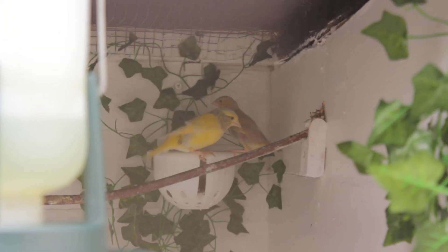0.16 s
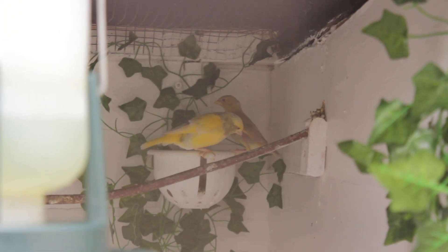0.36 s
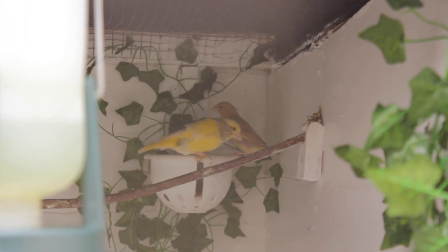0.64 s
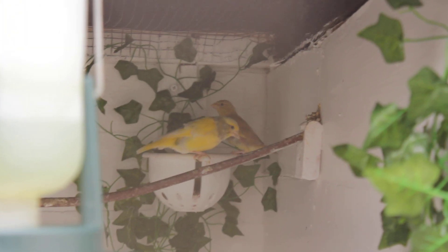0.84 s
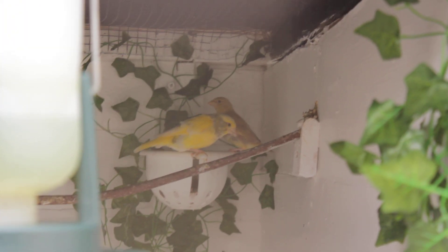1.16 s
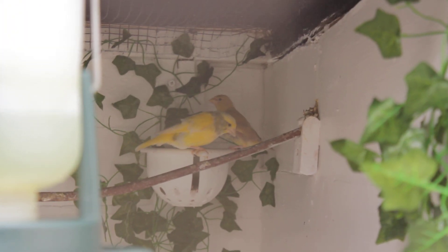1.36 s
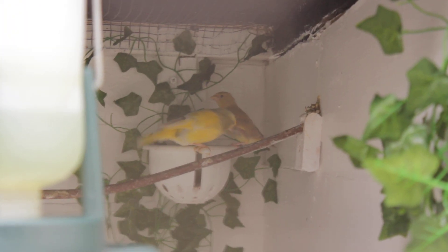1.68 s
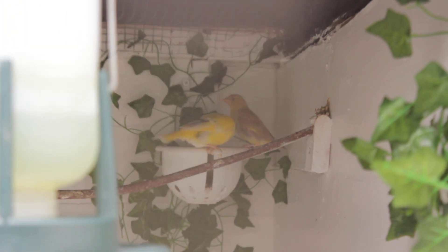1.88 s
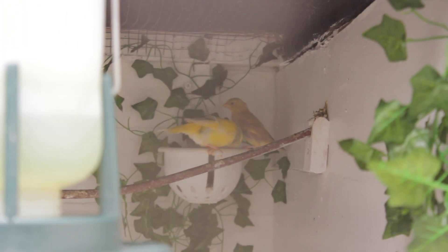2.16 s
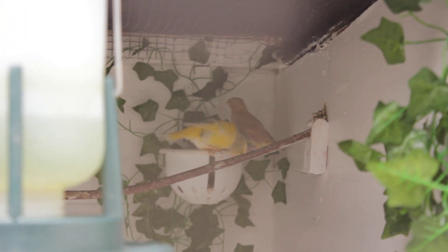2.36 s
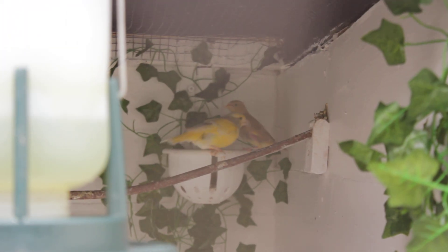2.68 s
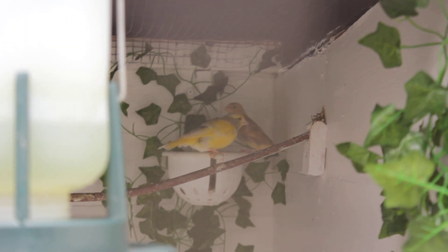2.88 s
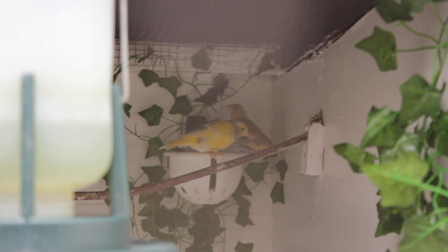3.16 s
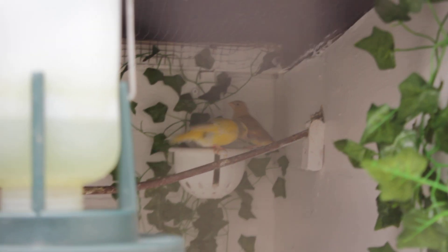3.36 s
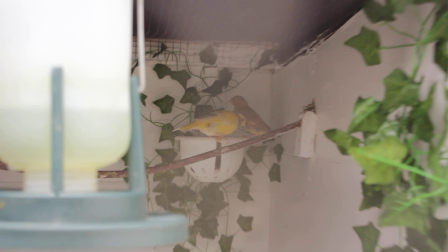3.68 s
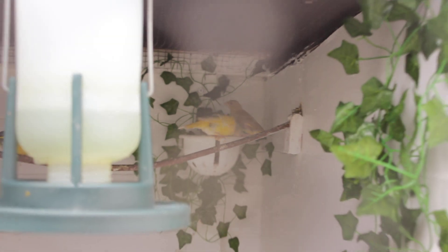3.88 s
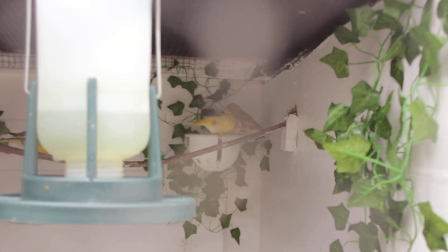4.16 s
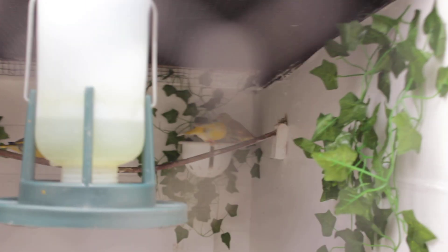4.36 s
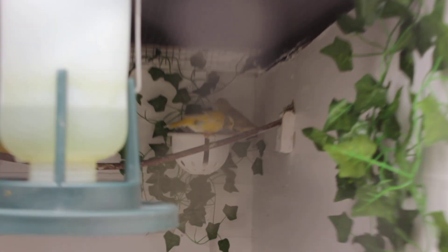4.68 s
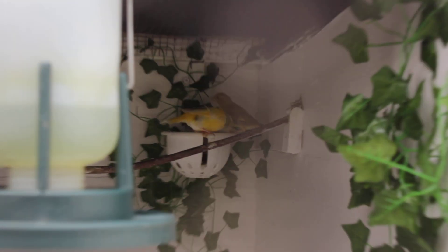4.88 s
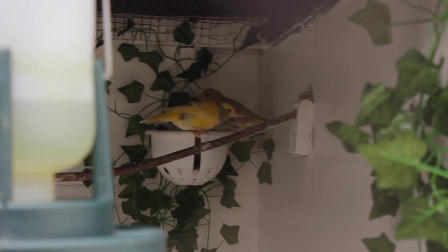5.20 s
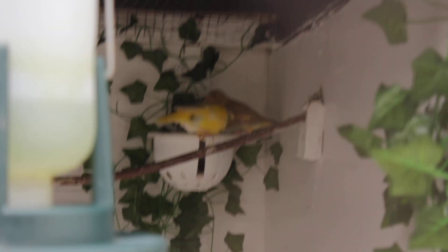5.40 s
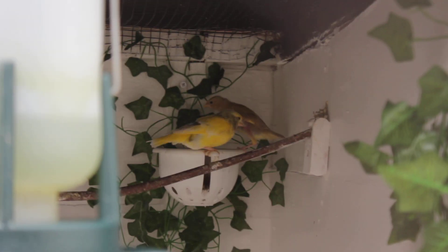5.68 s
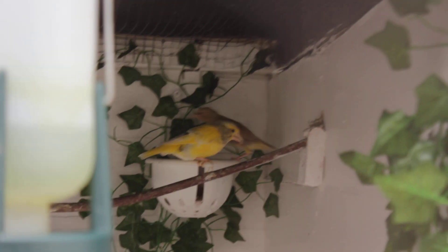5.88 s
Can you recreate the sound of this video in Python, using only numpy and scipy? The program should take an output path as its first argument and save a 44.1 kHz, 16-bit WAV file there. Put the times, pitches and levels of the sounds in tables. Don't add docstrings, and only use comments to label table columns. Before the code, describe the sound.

A small hard-walled birdroom, finches close to a handheld microphone with faint hiss. At 0 s there is a knock with rumble and a burst of twitter, then a high chip. From 0.3 to 1.0 s a bird runs a fast falling trill, about twelve notes a second; from 1.1 to 1.8 s it becomes wider rising sweeps with tiny crackles. Around 1.9-2.3 s come dropping chirps, then a low pure whistle near 2.4 s and a twice-repeated reedy phrase until 2.9 s. Falling cries follow at 3.1-3.5 s. Clear high whistles hold at 3.65 and 4.0 s. Rapid chatter runs 4.3-4.65 s, then a softer low trill to 5.1 s, with a faint motor whine and a rustling bump near 4.9 s. Four buzzy chips sound at 5.55-5.9 s over a stronger distant chorus, ending on a falling cry. Perch knocks tap irregularly, mainly after 2 s.

```python
import sys
import numpy as np
from scipy import signal
from scipy.fft import rfft, irfft
from scipy.io import wavfile
from scipy.ndimage import map_coordinates

SR = 44100
rng = np.random.default_rng(int(sys.argv[2]) if len(sys.argv) > 2 else 0)


def persist_wave(psi):
    counts = np.round(np.clip(psi, -1, 1) * 32767).astype(np.int16)
    wavfile.write(sys.argv[1], SR, np.atleast_2d(counts).T)


def to_linear_factor(level_db):
    exponent = np.asarray(level_db, float) / 20
    return 10 ** exponent


N = 266319


def in_time(rows):
    s, *columns = np.transpose(rows)
    return [np.interp(np.arange(N) / SR, s, c) for c in columns]


def at_hz(points, hz):
    points = np.array(points)
    return np.interp(np.log(hz), np.log(points[:, 0]), points[:, 1])


def rms_one(x):
    return x / np.sqrt(np.mean(x ** 2) + 1e-20)


def band(x, lo_hz, hi_hz):
    limits = [lo_hz, min(hi_hz, .45 * SR)]
    return signal.sosfilt(signal.butter(2, limits, "band", fs=SR, output="sos"), x)


def drift(rate_hz):
    r = np.exp(-2 * np.pi * rate_hz / SR)
    noise = rng.standard_normal(N + SR)
    smooth = signal.lfilter([1], [1, -2 * r, r * r], noise)
    return rms_one(smooth[SR:])


def add(out, s, sound):
    at = max(int(s * SR), 0)
    out[at:at + len(sound)] += sound[:max(N - at, 0)]


def room(x, stretch):
    # f/Hz, time to fall 60 dB/s
    decay = [(1500, 0.048), (3500, 0.33), (7000, 0.36), (14000, 0.15)]
    early_db, early_t60_s = -2.5, 0.18
    edges_hz = [60, 2000, 5000, 10000, 18000]
    t = np.arange(SR // 2) / SR
    noise = rng.standard_normal((5, len(t)))
    tail = noise[4] * to_linear_factor(early_db - 60 * t / early_t60_s)
    for k, (hz, t60) in enumerate(decay):
        tail = tail + band(noise[k], edges_hz[k], edges_hz[k + 1]) * to_linear_factor(-60 * t / (t60 * stretch))
    tail = tail * np.clip(t / 0.0023, 0, 1)
    return signal.fftconvolve(x, tail / np.sqrt(np.sum(tail ** 2)))[:N]


def syrinx(pitch, overtones):
    # f/Hz, level/dB
    beak = [(4000, -9.5), (5900, -1), (6700, -2.5), (7800, -14.5), (11000, 0), (14000, -9), (16000, -25)]
    phase = 2 * np.pi * np.cumsum(pitch) / SR
    voice = np.sin(phase)
    for multiple, db in overtones:
        k = round(2 * multiple) / 2
        level = to_linear_factor(db + at_hz(beak, k * pitch))
        voice = voice + level * np.sin(k * phase) * (k * pitch < .4 * SR)
    return np.sqrt(2) * voice


def note_time(length):
    return np.arange(int(max(length, .005) * SR)) / SR


def glide(length, start_hz, end_hz, bend, overtones, hook=0, attack=0.0005, release=0.0008):
    t = note_time(length)
    along = np.clip((t - hook) / (t[-1] + 1 / SR - hook), 0, 1)
    pitch = end_hz + (start_hz - end_hz) * (1 - along) ** max(bend, .1)
    shape = np.clip(np.minimum(t / attack, (t[-1] - t) / release), 0, 1)
    return syrinx(pitch, overtones) * np.sin(shape * np.pi / 2) ** 2


def air():
    # f/Hz, level/dB per Hz
    spectrum = [(15, -37), (40, 0.5), (100, -21), (300, -22.5), (800, -5), (2000, -29), (4900, -0.5),
                (6000, -36), (15500, -61)]
    colour = to_linear_factor(at_hz(spectrum, np.arange(1, N // 2 + 2) * SR / N))
    return to_linear_factor(-54) * rms_one(irfft(rfft(rng.standard_normal(N)) * colour, N))


def handling_rumble():
    # t/s, level/dB
    handling = [(0.0, -15.5), (0.12, -40.5), (0.57, -50.5), (1.82, -47.5), (2.47, -36.5), (3.25, -48.5),
                (4.86, -39), (4.91, -29.5), (5.08, -32), (6.04, -47.5)]
    level_db, = in_time(handling)
    noise = band(rng.standard_normal(N), 93.0, 376)
    return to_linear_factor(level_db - 8.5 + 2.96 * drift(19.0)) * rms_one(noise)


def stirring():
    # t/s, rustle level/dB
    stir = [(0.0, -36), (0.12, -48.5), (0.57, -62), (1.82, -55), (2.47, -39.5), (3.25, -51.5), (4.0, -36.5),
            (4.8, -35.5), (4.92, -24), (5.08, -29), (6.04, -47)]
    hiss_follows = 0.17
    rustle_db, = in_time(stir)
    hiss_db = -60 + hiss_follows * (rustle_db + 45)
    rustle = rms_one(band(band(rng.standard_normal(N), 580, 4170), 250, 9800))
    hiss = rms_one(band(rng.standard_normal(N), 5200, 12500))
    return to_linear_factor(rustle_db - 5.0 + 3.4 * drift(9.6)) * rustle + to_linear_factor(hiss_db + 2.5 * drift(9)) * hiss


def far_chorus(count=2200):
    # t/s, twitter level/dB
    twitter = [(0, -19), (.1, -41), (.3, -43), (1.1, -75), (1.8, -41), (2.2, -37.5), (3.1, -37), (3.6, -40),
               (4, -40.5), (4.3, -34), (4.5, -45), (4.75, -44), (4.9, -36), (5.18, -29.5), (5.28, -33),
               (5.38, -28.5), (6.04, -29.5)]
    out = np.zeros(N)
    for when, long, high, slide, loud in rng.random((count, 5)):
        middle_hz = 2800 * (4600 / 2800) ** high
        sweep = 1 + .5 * (slide - .3)
        chip = glide(.01 + .015 * long, middle_hz * sweep, middle_hz / sweep, 1.2, [])
        add(out, when * N / SR, to_linear_factor(5 * loud) * chip)
    level_db, = in_time(twitter)
    return to_linear_factor(level_db) * rms_one(room(out, stretch=1.1))


def knocks():
    # t/s, peak level/dB, wood f/Hz, crack level/dB
    hops = [(0.009, -14, 143, -43), (0.4, -58, 121, -68), (1.11, -53, 204, -30), (1.627, -42, 724, -34),
            (1.897, -38, 183, -39), (2.092, -35, 109, -29), (2.387, -31, 175, -25),
            (2.472, -35, 313, -25.5), (2.557, -23, 760, -30), (2.78, -29, 141, -25),
            (2.958, -32, 730, -31.5), (3.025, -27, 227, -54), (3.129, -31.5, 600, -35),
            (3.283, -36, 620, -39), (3.394, -38, 183, -33.5), (3.479, -38, 510, -68),
            (4.003, -29.5, 840, -26.5), (4.11, -28.5, 312, -23), (4.333, -25, 1060, -22),
            (4.345, -52, 543, -17.5), (4.553, -28, 119, -22), (4.589, -20, 770, -46),
            (4.865, -23, 774, -27), (4.9, -37, 119, -28), (4.945, -45, 300, -29), (5.375, -24, 322, -40),
            (5.43, -22.5, 344, -26.5), (5.867, -27.5, 191, -27), (5.899, -24.5, 236, -53),
            (5.97, -27, 191, -53)]
    # t/s, f/Hz, level/dB, length/s
    drum = [
        (4.905, 103, -28, .09),
    ]
    out, t = np.zeros(N), np.arange(SR // 8) / SR
    for s, db, hz, crack_db in hops:
        wood = np.sin(2 * np.pi * hz * t) * to_linear_factor(-60 * t / 0.034)
        noise = rng.standard_normal(len(t))
        crack = rms_one(band(band(noise, 200, 4500), 140, 6500)) * to_linear_factor(-60 * t / 0.1)
        add(out, s, to_linear_factor(db - 5.5) * wood)
        add(out, s, to_linear_factor(crack_db - 10.0) * crack)
    for s, hz, db, length in drum:
        shape = np.clip(np.minimum(t / 0.0029, (length - t) / 0.037), 0, 1)
        add(out, s, to_linear_factor(db) * np.sin(2 * np.pi * hz * t) * shape)
    return out


def calls():
    loud_cry = {"falling trill": (0.055, 4722, 2900, 2.4, 0.0061), "foot": (0.031, 2690, 2666, 1.5, 0.0088),
                "rising trill": (0.115, 2980, 4790, 2.8, 0.041),
                "broad foot": (0.04, 2800, 2510, 2.06, 0.0093),
                "broad fall": (0.105, 4450, 2505, 4.2, 0.02), "chatter": (0.012, 5150, 2900, 1.2, 0.002),
                "chatter back": (0.016, 3300, 4850, 1.257, 0.003),
                "long fall": (0.118, 4080, 2100, 1.1, 0.019), "drop": (0.018, 5830, 2900, 1.4, 0.0023),
                "scoop": (0.048, 2400, 2780, 3, 0.0015), "dip": (0.049, 2640, 2590, 0.83, 0.003),
                "pickup": (0.04, 3550, 4600, 2.94, 0.0075), "crest": (0.0535, 4800, 5540, 2.76, 0.011),
                "chip": (0.0266, 5750, 5050, 3.47, 0.0026), "lead-in": (0.0217, 6150, 5600, 0.95, 0.024),
                "arc": (0.059, 2800, 2660, 0.734, 0.022)}
    soft_cry = {"reed": (0.0536, 5520, 5420, 6.0, 0.011), "low tuck": (0.02, 2730, 2470, 1.26, 0.0015),
                "mid tuck": (0.022, 3700, 3750, 1.3, 0.0031), "seep": (0.036, 7500, 7000, 2.3, 0.004),
                "thin fall": (0.05, 9800, 7300, 1.8, 0.006),
                "thin whistle": (0.091, 6980, 6780, 1.4, 0.004),
                "far drop": (0.027, 6500, 4200, 0.78, 0.002), "slip": (0.14, 4000, 3200, 3.5, 0.0075),
                "low slip": (0.051, 3650, 2100, 2.1, 0.0056), "croon": (0.0176, 1590, 1620, 0.91, 0.0032),
                "low trill": (0.0426, 2650, 2185, 5.07, 0.0023),
                "beak snap": (0.027, 5850, 7000, 1.3, 0.0058), "fall tail": (0.049, 3050, 2300, 1.1, 0.017),
                "grunt": (0.0215, 2150, 2350, 1.5, 0.0027), "swoop": (0.086, 7300, 5100, 0.45, 0.015),
                "short swoop": (0.058, 5900, 4900, 0.616, 0.0089),
                "far whistle": (0.08, 5900, 5300, 1.8, 0.023), "rasp": (0.011, 8100, 6900, 1.2, 0.003),
                "low hum": (0.07, 2300, 2120, 1.6, 0.0087), "haze": (0.022, 7400, 3800, 0.73, 0.0027)}
    reedy_names = ("crest", "chip", "lead-in", "reed")
    song = {"falling trill": [(0.366, -15.5, 4710), (0.449, -18.5, 4700), (0.535, -18.5, 4700),
            (0.613, -19, 4900), (0.696, -18, 4690), (0.778, -17, 4900), (0.862, -17.5, 4820),
            (0.946, -16, 4666)], "foot": [(0.322, -15.5), (0.408, -24.5), (0.49, -23.5), (0.572, -22),
            (0.655, -23), (0.737, -17.5), (0.82, -20.5), (0.905, -22), (0.99, -26)],
            "broad foot": [(3.09, -22), (3.285, -19.5), (3.485, -26)],
            "rising trill": [(1.187, -16.5, 2880), (1.312, -15, 3030), (1.441, -17, 2910),
            (1.573, -18, 2930), (1.701, -19.5, 2970)], "broad fall": [(3.234, -16.5), (3.437, -17.5),
            (5.995, -14.5)], "chatter": [(4.301, -25.5), (4.342, -19.5), (4.8, -30), (4.426, -22.5),
            (4.468, -21.5), (4.511, -21), (4.553, -19), (4.592, -23, 4700), (4.612, -26, 4500)],
            "chatter back": [(4.312, -30.5), (4.352, -38), (4.405, -30), (4.438, -30), (4.48, -28),
            (4.525, -30.5), (4.567, -33), (4.604, -33), (4.63, -36.5)], "long fall": [(4.736, -25.5),
            (4.968, -25.5), (5.205, -30.5)], "drop": [(1.953, -21, 6300), (2.145, -13), (5.168, -26)],
            "scoop": [(2.004, -32.5), (2.174, -28.5)], "arc": [(2.548, -24.5), (2.798, -24.5)],
            "dip": [(2.63, -20), (2.895, -20.5)], "pickup": [(2.49, -23, 3810), (2.742, -23, 3830)],
            "crest": [(2.532, -21.5), (2.785, -22.5)], "chip": [(5.55, -19, 5700), (5.652, -17.5, 5710),
            (5.755, -19, 5770), (5.855, -20.5, 5670)], "lead-in": [(5.532, -26.5), (5.634, -32.5),
            (5.734, -26.5), (5.838, -29.5)]}
    answers = {"reed": [(2.285, -29, 5000), (2.495, -32.5, 5600)], "low tuck": [(5.55, -28), (5.655, -29),
               (5.755, -28), (5.86, -29)], "mid tuck": [(5.582, -28.5), (5.667, -30), (5.769, -33),
               (5.808, -29, 3100), (5.722, -32.5, 3550), (5.605, -31, 3300)], "seep": [(5.497, -38.5),
               (5.593, -40.5), (5.706, -39), (5.863, -43)], "thin fall": [(2.931, -50.5), (3.141, -49),
               (3.391, -52.5), (3.629, -57)], "thin whistle": [(1.068, -58), (2.612, -47.5), (2.78, -45.5)],
               "far drop": [(3.01, -39, 5930), (3.21, -38), (3.892, -48)], "slip": [(3.621, -45),
               (3.922, -38), (3.855, -44.5, 4500)], "low slip": [(3.224, -26.5), (3.712, -43.5)],
               "croon": [(4.845, -36), (4.918, -19), (4.953, -19.5)], "low trill": [(4.655, -30.5),
               (4.712, -29.5), (4.772, -28), (4.83, -29), (4.89, -30.5), (4.945, -32), (5.003, -29.5),
               (5.06, -29.5), (5.115, -31)], "beak snap": [(1.18, -41.5), (1.313, -38), (1.44, -37),
               (1.57, -39.5), (1.7, -44)], "fall tail": [(4.8, -32), (5.035, -31.5), (5.265, -32)],
               "grunt": [(2.503, -31.5), (2.753, -38.5)], "swoop": [(1.872, -37.5), (3.52, -52, 7500)],
               "short swoop": [(2.112, -32.5)], "far whistle": [(0.26, -44.5), (0.36, -48), (0.472, -50.5)],
               "rasp": [(4.8, -46), (5.398, -42), (7, -42), (2.46, -44)], "low hum": [(2.615, -46),
               (2.83, -47.5)], "haze": [(3, -29, 6600), (2.88, -36.5, 6000), (1.578, -47, 7700),
               (4.78, -49), (4.81, -46), (4.94, -42), (5.33, -37.5, 5000), (5.1, -38, 5500)]}
    # t/s, length/s, start f/Hz, end f/Hz, level/dB
    flicks = [
        (0.288, 0.043, 4260, 2723, -16.5),
        (1.115, 0.039, 2300, 4310, -17.5),
        (1.64, 0.086, 5700, 5450, -43),
        (3.062, 0.052, 4460, 2494, -17.5),
        (4.005, 0.0092, 3500, 4060, -27.5),
        (4.58, 0.0714, 2800, 2300, -39),
        (0.148, 0.038, 6170, 5270, -22),
        (5.462, 0.048, 5730, 5120, -25),
    ]
    slides = [(0.53, 0.036, 5256, 5160, -44), (1.5, 0.012, 4180, 4750, -27),
              (1.519, 0.11, 6900, 6030, -44.5), (1.834, 0.02, 5480, 6580, -31),
              (2.049, 0.035, 6360, 7100, -32), (2.291, 0.042, 2624, 2760, -30),
              (2.401, 0.03, 4700, 4750, -41), (2.54, 0.08, 4700, 4730, -39), (2.84, 0.036, 5520, 5560, -32),
              (2.688, 0.08, 3650, 3500, -35.5), (2.855, 0.024, 2650, 2640, -16.5),
              (2.584, 0.014, 3670, 3570, -32.5), (4.14, 0.052, 2470, 3380, -32.5),
              (4.185, 0.11, 3280, 3890, -35), (4.259, 0.044, 2690, 2950, -30),
              (3.112, 0.095, 7230, 6970, -50.5), (3.335, 0.064, 6590, 6450, -57),
              (4.685, 0.029, 4500, 4700, -36.5), (5.188, 0.03, 4450, 4700, -17),
              (5.21, 0.038, 3500, 4100, -17), (4.8, 0.02, 2900, 3900, -28), (5.25, 0.0505, 4050, 4000, -29),
              (5.165, 0.025, 2200, 2900, -38.5), (0.087, 0.029, 4400, 5250, -27.5),
              (5.33, 0.026, 4600, 4550, -35), (5.495, 0.054, 6000, 5900, -44),
              (5.245, 0.084, 4620, 4515, -28), (5.385, 0.1, 3490, 3560, -32)]
    murmurs = [
        (3.606, 0.07, 780, 864, -50.5),
        (3.696, 0.035, 1076, 1180, -45),
        (4.36, 0.091, 1027, 1020, -49),
        (5.009, 0.14, 1593, 1820, -35),
        (5.191, 0.27, 1750, 1836, -48.5),
        (5.423, 0.077, 1840, 1740, -40),
    ]
    notes = []
    for repeats, shapes in [(song, loud_cry), (answers, soft_cry)]:
        for name in repeats:
            length, usual_hz, end_hz, bend, attack = shapes[name]
            for s, db, *own in repeats[name]:
                start_hz = own[0] if own else usual_hz
                notes.append((s, db, length, start_hz, end_hz, bend, attack, name in reedy_names))
    for rows, bend in [(flicks, 3.6), (slides + murmurs, 0.88)]:
        for s, length, start_hz, end_hz, db in rows:
            notes.append((s, db, length, start_hz, end_hz, bend, 0.0034, False))
    return notes


def buzz(length):
    return 1 + .8 * np.cos(2 * np.pi * 115 * note_time(length))


def near_birds():
    # multiple of the pitch, level/dB
    pure = [(2, -29), (3, -29)]
    rising = [(2, -22.5), (3, -26), (4, -30)]
    hooked = [(2, -40.5), (3, -32)]
    # multiple of that leading line, level/dB
    reedy_lines = [(1.5, -10.5), (2, -22), (2.5, -24), (3, -26)]
    distant_db, flutter_db = -31, 5.0
    near, distant = np.zeros((2, N))
    for s, db, length, start_hz, end_hz, bend, attack, reedy in calls():
        hook, release = 0, min(0.0048, length / 4)
        if start_hz > 1.5 * end_hz and length > .045:
            voice, hook, release = hooked, 0.14 * length, 0.67 * length
        elif reedy:
            voice = reedy_lines
        elif end_hz > 1.2 * start_hz:
            voice, release = rising, 0.6 * length
        else:
            voice = pure
        note = glide(length, start_hz, end_hz, bend, voice, hook, max(attack, .001), release)
        if reedy:
            note = note * buzz(length)
        add(distant if db < distant_db else near, s, to_linear_factor(db) * note)
    out = near + distant * to_linear_factor(flutter_db * drift(80))
    wobble = .3 * drift(150)
    out = map_coordinates(out, [np.arange(N) + wobble], order=3)
    return out * (1 + .17 * drift(80))


def held_tones():
    # t/s, length/s, f/Hz, level/dB
    tones = [
        (.33, 0.84, 2668, -26.5),
        (2.511, 0.61, 2608, -27.5),
        (4.65, 0.46, 2190, -33),
    ]
    out = np.zeros(N)
    for s, length, hz, db in tones:
        add(out, s, to_linear_factor(db) * glide(length, hz, hz, 1, [], release=0.14))
    return out * to_linear_factor(3.5 * drift(14))


def whistles():
    # t/s, f/Hz, level/dB
    whistle_lines = [
        [(3.632, 5470, -52), (3.648, 5200, -25), (3.682, 5045, -13.5), (3.712, 5036, -11), (3.73, 4986, -26.5),
         (3.742, 5023, -19.5), (3.808, 5047, -12), (3.892, 5028, -36), (3.9, 5000, -40)],
        [(3.958, 5423, -49), (3.974, 5080, -22), (3.992, 5054, -12), (4.024, 5037, -9.5), (4.094, 5013, -17),
         (4.1, 4940, -25), (4.122, 4982, -15.5), (4.168, 4997, -20.5), (4.3, 4940, -52)],
        [(2.34, 2736, -27), (2.368, 2680, -11.5), (2.385, 2675, -13), (2.408, 2665, -29), (2.428, 2666, -11.5),
         (2.44, 2640, -28), (2.468, 2663, -23), (2.478, 2646, -33), (2.51, 2650, -27)],
    ]
    slur = [(3.77, 2316, -30.5), (3.79, 2460, -41), (3.831, 2793, -38), (3.9, 2887, -25.5),
            (3.968, 2946, -35.5), (4.06, 2780, -50)]
    # multiple of the pitch, level/dB
    whistle_overtones = [(2, -29.5), (3, -23)]
    out, t = held_tones(), np.arange(N) / SR
    for rows in [*whistle_lines, slur]:
        pitch, db = in_time(rows)
        ends = np.clip(np.minimum(t - rows[0][0], rows[-1][0] - t) / 0.0023, 0, 1)
        out += syrinx(pitch, whistle_overtones) * to_linear_factor(db) * ends
    return out


def lens_motor():
    # f/Hz, width/Hz, level/dB
    resonances = [(9200, 350, -2), (10100, 250, -4), (11000, 300, -4), (12500, 900, 2), (13750, 300, -2)]
    # t/s, level/dB
    motor_on = [
        (4.38, -80),
        (4.46, -53),
        (4.7, -50),
        (4.84, -54),
        (4.95, -80),
    ]
    out, noise = 0, rng.standard_normal(N)
    for hz, width_hz, db in resonances:
        out = out + to_linear_factor(db) * rms_one(band(noise, hz - width_hz / 2, hz + width_hz / 2))
    return rms_one(out) * to_linear_factor(in_time(motor_on)[0])


def scene():
    birds, held, hops = near_birds(), whistles(), knocks()
    direct = to_linear_factor(-4) * birds + to_linear_factor(-2.6) * held + hops
    echoes = room(to_linear_factor(0.5) * birds + to_linear_factor(-6) * held + to_linear_factor(3.5) * hops, stretch=0.78)
    background = far_chorus() + handling_rumble() + stirring() + lens_motor() + air()
    return (direct + echoes + background)[None]


def band_limit(x):
    return signal.sosfilt(signal.butter(12, 15750, fs=SR, output="sos"), x)


def record(dry):
    # t/s, depth/dB, recovery/s
    ducks = [
        (0.058, 2, 0.022),
        (1.092, 3, 0.042),
        (3.046, 7, 0.026),
        (3.603, 4, 0.061),
        (4.362, 5.5, 0.042),
        (5.443, 6.5, 0.048),
    ]
    # t/s, peak level/dB
    tick_list = [(0.401, -27.5), (0.318, -34), (.656, -51), (.745, -29.5), (0.798, -32), (1.361, -28),
                 (1.476, -37), (1.52, -36), (1.632, -23), (1.75, -26), (1.23, -27.5), (1.268, -28.5),
                 (1.371, -33), (1.398, -33), (1.5, -27.5), (3.042, -23.5), (3.071, -31), (3.082, -28)]
    t, cut_db, ticks = np.arange(N) / SR, np.zeros(N), np.zeros(N)
    for s, depth_db, recovery_s in ducks:
        cut_db += depth_db * (t > s) * np.clip(1.5 - (t - s) / recovery_s, 0, 1)
    x = dry * to_linear_factor(-cut_db)
    x = x + .05 * band(x ** 2, 6500, 16000)
    x = 1.75 * np.tanh(x / 1.4)
    for s, db in tick_list:
        ticks[int(s * SR)] = to_linear_factor(db + 14.0)
    return band_limit(x + band(band(ticks, 500, 10000), 300, 10000))


dry = scene()
out = record(dry)
persist_wave(out)
```